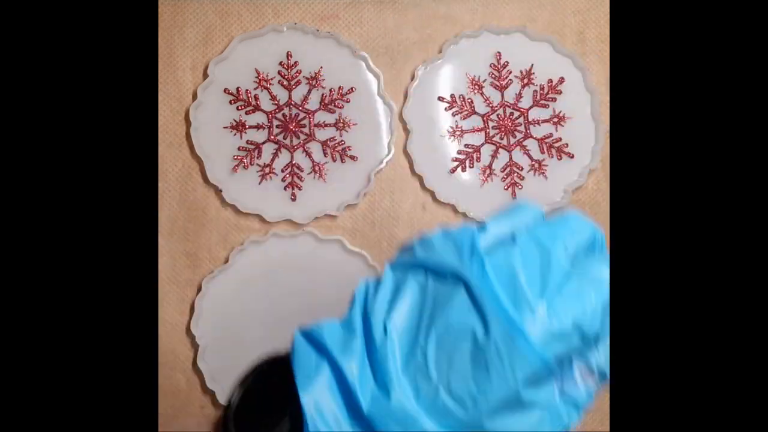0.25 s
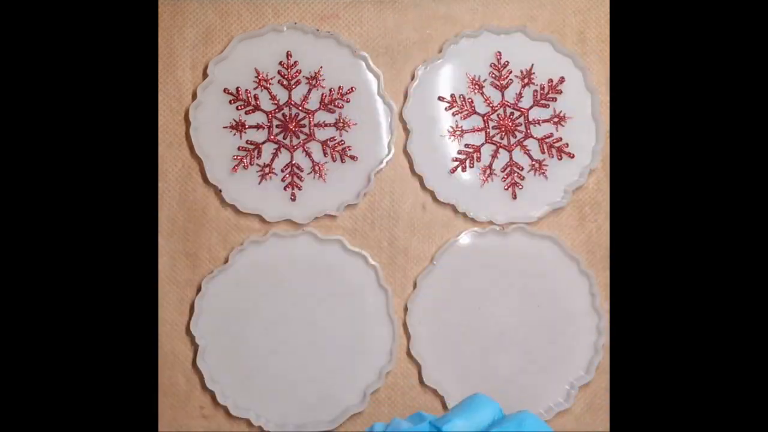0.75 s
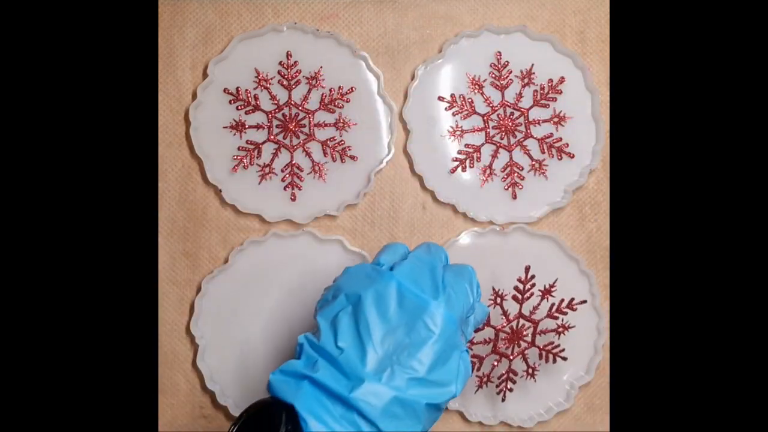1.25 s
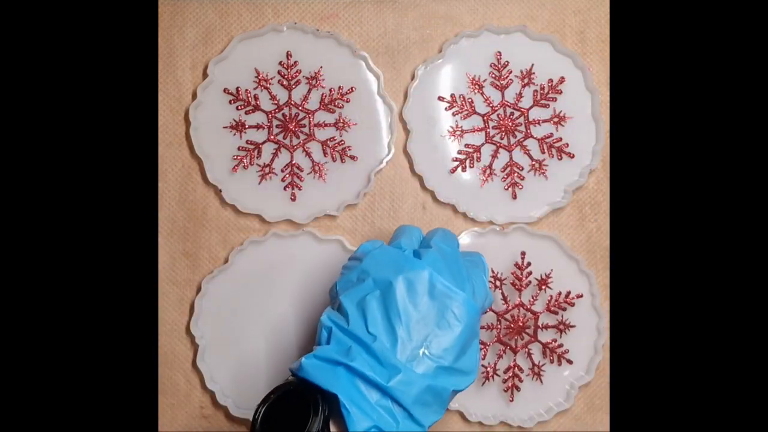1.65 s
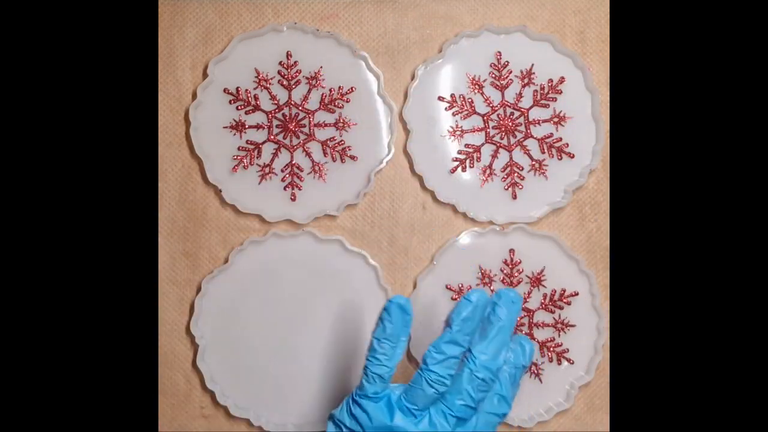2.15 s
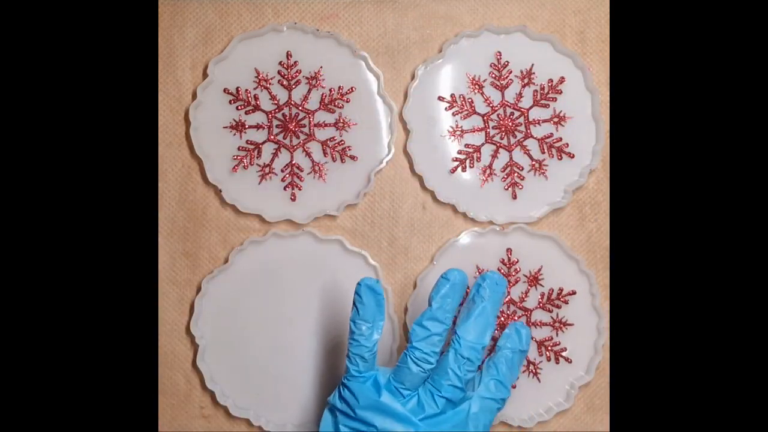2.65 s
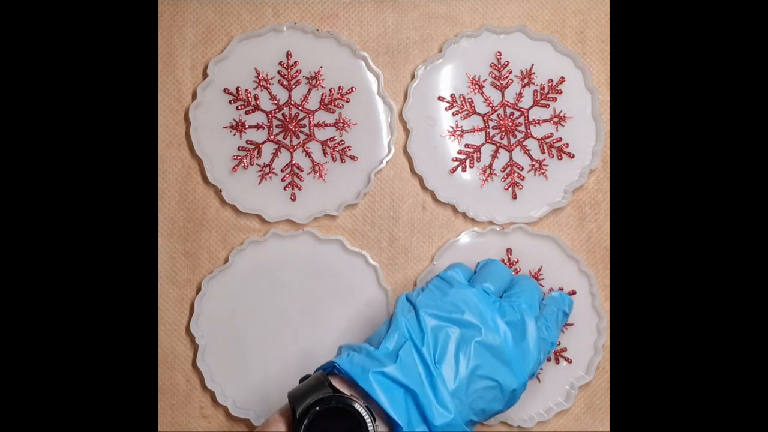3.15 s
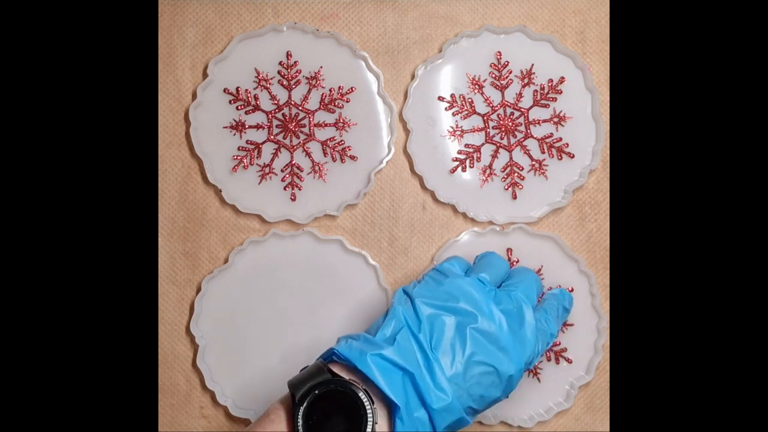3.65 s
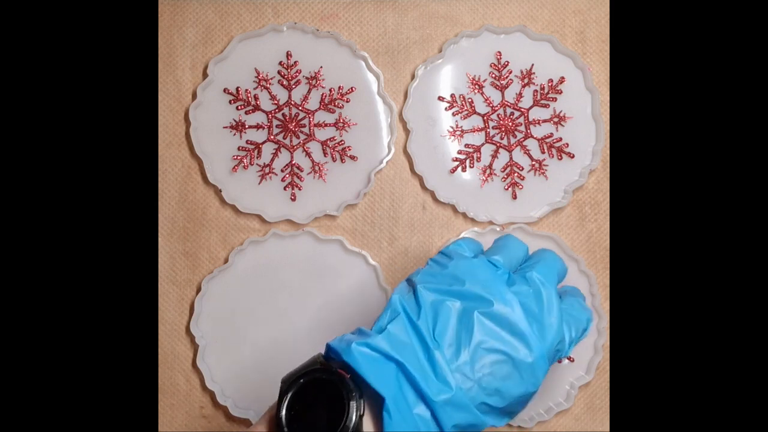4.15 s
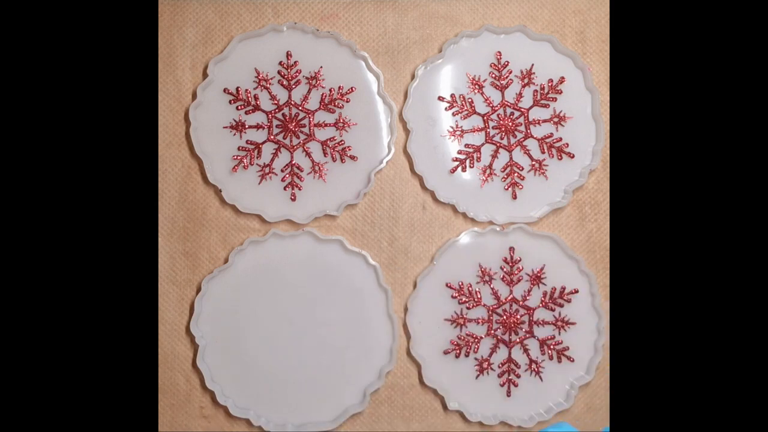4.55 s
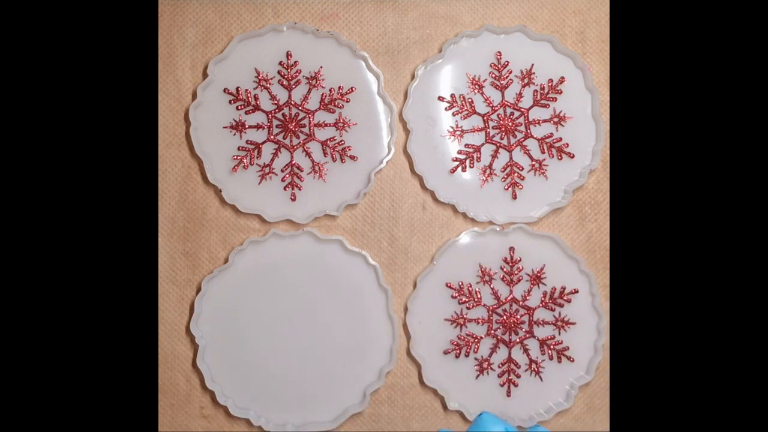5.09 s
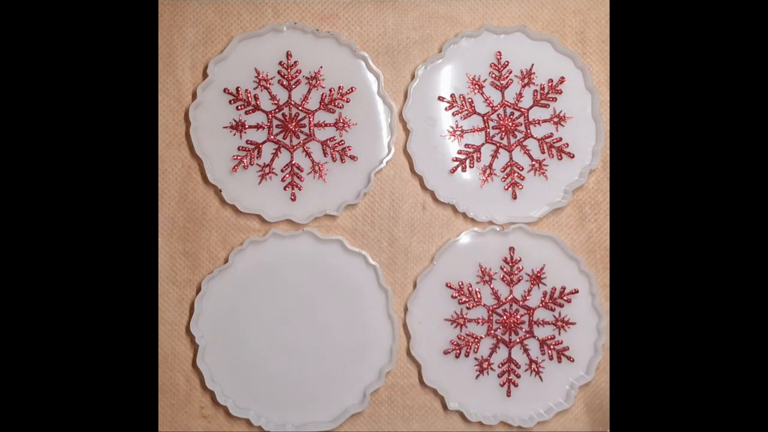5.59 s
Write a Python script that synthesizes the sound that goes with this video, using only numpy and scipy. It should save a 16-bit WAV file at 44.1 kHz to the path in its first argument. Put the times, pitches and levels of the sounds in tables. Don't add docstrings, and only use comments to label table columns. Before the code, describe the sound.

In a quiet room, crisp glove snaps and hard plastic clacks come in one short burst, then return as busier, louder digging.

```python
import sys
import numpy as np
from scipy import signal
from scipy.io import wavfile

SR = 44100
rng = np.random.default_rng(int(sys.argv[2]) if len(sys.argv) > 2 else 0)


def gain_from_db(level_db):
    decades = np.asarray(level_db, float) / 20
    return 10 ** decades


def master(y):
    cut = np.clip(np.atleast_2d(y).T, -1, 1)
    pcm = np.round(cut * 32767)
    wavfile.write(sys.argv[1], SR, pcm.astype(np.int16))


N = 256833

# freq_hz, level_db_per_hz
HUM_SPECTRUM = [(18, -27), (28, -7.5), (50, -3), (100, -8), (200, -1.5), (400, 0), (600, -7.5),
                (1000, -11.5), (2000, -15), (4000, -17.5), (6800, -18.5), (8500, -21), (10000, -60),
                (11500, -34), (17000, -41)]
# freq_hz, correlation
HUM_LIKENESS = [(60, 0.34), (180, 0.84), (550, 0.12), (1650, 0.0074), (15000, -0.26)]
# freq_hz, left_over_right_db
HUM_BALANCE = [(60, 1), (400, 1.5), (2400, 3.5), (8000, 10), (15000, -2)]
# start_s, peak_db, pitch_hz, t60_s
THUDS = [
    (0.01, -37.5, 419, 0.036),
    (0.706, -55, 222, 0.13),
    (4.658, -42.5, 452, 0.051),
    (4.785, -36, 208, 0.067),
    (4.786, -46, 90, 0.1),
    (4.967, -37.5, 72, 0.095),
    (4.972, -37.5, 148, 0.097),
    (5.59, -38.5, 80.6, 0.089),
]
# crest_s, glove_db, ornament_db, swell_20db_s, fade_20db_s
STROKES = [(.01, -71, -63, .05, 0.2), (.42, -53, -66.5, 0.2, 0.1), (.6, -59, -47, 0.08, 0.3),
           (.716, -25.5, -31, 0.0514, 0.0425), (.785, -35.5, -36, 0.08, 0.1156), (1.1, -56, -70, 0.5, 0.2),
           (1.28, -64, -78.5, 0.5, 0.6), (1.81, -58.5, -57, 0.14, 0.14), (2.19, -44, -55.5, 0.1744, 0.1545),
           (2.32, -55.5, -71, 0.13, 0.12), (2.85, -47.5, -58, 0.13, 0.16), (2.99, -51, -64, .14, .2),
           (3.27, -59.5, -72, .08, .1), (4.53, -58.5, -70, 0.15, .08), (4.64, -62, -64.5, 0.23, 1.5),
           (4.83, -56, -55.5, 0.09, 0.4), (4.95, -54, -46.5, 0.06, 0.1), (5.07, -52, -42.5, .06, 0.1),
           (5.2, -50, -47.5, 0.09, 0.1), (5.371, -43.5, -39.5, 0.0758, .1),
           (5.469, -21.5, -26, 0.0677, .11), (5.6, -34, -29, 0.0574, 0), (5.679, -26, -29, 0.0971, 0.04),
           (5.77, -23, -28, 0.0769, 0.03)]
# start_s, crease_db, knock_db, ring_hz
PICKING = [(.0946, -47.5, -53.5, 5600), (.2578, -47.5, -59, 6900), (.3475, -40, -50, 5580),
           (.3766, -40, -47, 6300), (.393, -49, -43.5, 5830), (.411, -40, -44, 6000),
           (.4192, -46, -44, 6500), (.4363, -41, -46, 4600), (.473, -51, -46, 4800),
           (.5093, -43, -50.5, 3470), (.5675, -35.5, -41, 2700), (.5834, -33, -41.5, 6640),
           (.6042, -44, -41, 916), (.6609, -27.5, -26.5, 1900), (.67, -49, -29, 830),
           (.7037, -10, -12, 1453), (.7187, -10, -16.5, 1500), (.756, -11.5, -15, 7360),
           (.775, -13, -17, 6540), (.7852, -10, -13, 7330), (.7959, -18.5, -23, 7180),
           (1.0348, -30.5, -56, 7970), (1.0673, -47, -53, 1410), (1.083, -41, -57, 6900),
           (1.1568, -41.5, -62, 7500), (1.2048, -51, -55, 6680), (1.224, -44, -45, 2000),
           (1.2584, -38.5, -49, 7440), (1.2807, -49, -51.5, 3100), (1.527, -35, -50.5, 5670)]
# start_s, crease_db, knock_db, ring_hz
PLACING = [(1.8154, -38.5, -29, 1400), (1.8624, -60.5, -45.5, 1600), (1.9403, -49.5, -68, 6070),
           (2.0573, -62, -48, 2330), (2.094, -50, -57, 7360), (2.1113, -39, -43.5, 6290),
           (2.13, -35, -45, 7350), (2.1436, -34, -39, 7800), (2.1591, -35, -36, 7580),
           (2.1646, -32, -35.5, 7460), (2.185, -32, -44, 7800), (2.2, -38, -45, 7600),
           (2.233, -38.5, -51, 1250), (2.2493, -50, -51, 7250), (2.2602, -46, -58, 6400),
           (2.3038, -41, -55.5, 6200), (2.3139, -50, -55.5, 7100), (2.773, -42, -56, 6050),
           (2.782, -42, -51.5, 6200), (2.7925, -45, -62, 5760), (2.815, -43, -46, 6500),
           (2.8267, -34, -42, 5460), (2.8515, -34, -43.5, 7440), (2.9272, -41, -47, 6360),
           (2.9348, -42.5, -52, 5500), (2.961, -42, -61, 6160), (2.985, -37, -40.5, 3530),
           (3.0408, -48, -58.5, 5040), (3.2696, -45, -53, 5430)]
# start_s, crease_db, knock_db, ring_hz
FEELING = [(4.6152, -45.5, -54, 5730), (4.6816, -33.5, -58, 5900), (4.7785, -35, -30, 905),
           (4.7896, -41, -23.5, 1080), (4.8471, -46.5, -45, 2180), (4.873, -47, -56, 4930),
           (4.9182, -28, -33, 7850), (4.9509, -37, -33, 995), (4.9668, -36, -31.5, 1180),
           (5.051, -26, -28, 1287), (5.074, -27.5, -40, 7100), (5.0925, -23, -33, 6900),
           (5.1478, -43, -40.5, 1430), (5.1728, -7.5, -19.5, 2128), (5.2218, -42, -32.5, 4500),
           (5.3328, -49, -48, 1140)]
# start_s, crease_db, knock_db, ring_hz
DIGGING = [(5.3626, -32, -27, 2920), (5.3673, -31, -30, 1394), (5.3866, -27, -24, 3820),
           (5.4125, -15, -20.5, 1565), (5.4394, -19, -21.5, 930), (5.451, -10.5, -13, 3610),
           (5.473, -17, -20.5, 1290), (5.4856, -7, -14.5, 1173), (5.5171, -9, -12.5, 1560),
           (5.5328, -16, -35, 6620), (5.5554, -9.5, -15.5, 1500), (5.593, -25, -29, 1130),
           (5.612, -23, -18.5, 1450), (5.6245, -16.5, -17.5, 1560), (5.6535, -22, -20.5, 1840),
           (5.6647, -10, -9.5, 4445), (5.683, -18.5, -27, 7750), (5.7008, -12.5, -12, 2203),
           (5.7478, -12, -17.5, 2330), (5.7546, -25, -16, 6860), (5.773, -8.5, -12.5, 6940),
           (5.8031, -24, -9.5, 1573)]

# low_hz, high_hz
BAND_HZ = [(300, 1500), (1500, 4000), (4000, 8600), (8600, 16500)]
CREASE_DB = [-29.5, -17, 0.1, -0.1]
KNOCK_DB = [0, 0.34, -18, -16]
RUB_GLOVE_DB = [-22.5, -9, -0.16, -10.5]
RUB_ORNAMENT_DB = [-0.1, -2, -14, -20]
BRIGHTEN_DB_PER_DB = [0.01, 0.01, 0.01, .15]
SNAP_DB = [-1, 0.54, -1.2, -4.5]
RUSTLE_DB = [1, 2, -3, 0.9]
RISE_MS = [2.37, 1.3, 1.0, 0.49]
BURST_MS = [5, 2.16, 1.53, 1.1]
# ring_hz, gain_db
SMALL_LOSES_BODY = [(1200, 0.07), (3000, -9.5)]
LARGE_LOSES_CLACK = [(900, -13.5), (1600, 0.42)]
TIGHT_GAINS_AIR = [(4000, -15.5), (5800, -22.5), (6600, -16), (7500, -2.5), (8300, 1)]

# freq_hz, level_db, t60_s
ORNAMENT_MODES = [(456.4, -1, 0.033), (759, -1, 0.2), (1020, -15, 0.23), (1165, 2, 0.043), (1438, 2.5, .07),
                  (1620, -21, 0.03), (2122, 2.5, 0.075), (2317, -9.5, .08), (3070, -6, 0.21),
                  (4060, -3.5, 0.034)]
# freq_hz, width_hz, level_db
FILM_MODES = [(5660, 1450, -6.5), (6500, 293, 4), (7420, 880, -1.5)]
# freq_hz, width_hz, depth_0_to_1
TABLE_DIPS = [(365, 140, 0.06), (589.4, 120, 0.76), (1820, 160, 0.3), (2740, 420, 0.54)]
# lag_s, level_db
ECHOES = [(.0052, -10), (.0031, -15)]
ROOM_T60_S = [0.28, 0.23, 0.2, 0.12]
ROOM_DB = [-5.5, -1.5, -8, -6]

HUM_DB = -58.5
RING_DB, RING_CYCLES = -1, 60.7
HARDEST_DB = -10
MIDDLE_DB = -35
TABLE_DB = -2
PAN_DB = 1.9


def rms_one(x):
    return x / np.sqrt(np.mean(x ** 2) + 1e-20)


def at_hz(points, hz):
    points_hz, values = np.array(points)[:, 0], np.array(points)[:, 1]
    return np.interp(np.log(hz), np.log(points_hz), values)


def band(x, low_hz, high_hz, order=2):
    return signal.sosfilt(signal.butter(order, [low_hz, high_hz], "band", fs=SR, output="sos"), x)


def drift(rate):
    r = np.exp(-40 * np.pi * rate / SR)
    noise = rng.standard_normal(N // 20 + 2002)
    slow = signal.lfilter([1], [1, -2 * r, r * r], noise)[2000:]
    return np.interp(np.arange(N) / 20, np.arange(len(slow)), rms_one(slow))


def resonate(x, hz, width_hz):
    r = np.exp(-np.pi * width_hz / SR)
    zeros = np.array([1, 0, -1]) * (1 - r * r) / 2
    poles = [1, -2 * r * np.cos(2 * np.pi * hz / SR), r * r]
    return signal.lfilter(zeros, poles, x)


def room_hum():
    out = 0
    edges_hz = 20 * 2 ** np.arange(0, 9.8, .4)
    white = rng.standard_normal((2, 2, N + SR))
    together = drift(0.83)
    for k, (low_hz, high_hz) in enumerate(zip(edges_hz, edges_hz[1:])):
        mid, side = band(white[k % 2], low_hz, high_hz)[:, SR:]
        hz = np.sqrt(low_hz * high_hz)
        alike = np.clip(at_hz(HUM_LIKENESS, hz), -1, 1)
        tilt_db = at_hz(HUM_BALANCE, hz) / 2
        gain = gain_from_db(at_hz(HUM_SPECTRUM, hz) + .5 * together + 1.9 * drift(7.5))
        pair = np.sqrt(1 + alike) * mid + np.sqrt(1 - alike) * side * [[1], [-1]]
        out = out + gain * pair * gain_from_db(np.array([[tilt_db], [-tilt_db]]))
    return gain_from_db(HUM_DB) * out / np.sqrt(np.mean(out.mean(axis=0) ** 2))


def thuds():
    out = np.zeros(N)
    for start_s, db, hz, t60_s in THUDS:
        t = np.clip(np.arange(N) / SR - start_s, 0, None)
        swell = 1 - np.exp(-t / 0.0017)
        out += gain_from_db(db - 60 * t / t60_s) * swell * np.sin(2 * np.pi * hz * t)
    return out


def by_band(glove_db, ornament_db, glove_colour_db, ornament_colour_db):
    parts = []
    for db, colour_db in ((glove_db, glove_colour_db), (ornament_db, ornament_colour_db)):
        brighter_db = np.outer(BRIGHTEN_DB_PER_DB, db - MIDDLE_DB)
        parts.append(db + np.array(colour_db)[:, None] + brighter_db)
    return 10 * np.log10(gain_from_db(parts[0]) ** 2 + gain_from_db(parts[1]) ** 2)


def effort():
    crest_s, glove_db, ornament_db, swell_s, fade_s = np.transpose(STROKES)[:, :, None]
    t = np.arange(0, N, 64) / SR - crest_s
    shape_db = -20 * np.maximum(-t / swell_s, t / fade_s)
    return [10 * np.log10(np.sum(gain_from_db(db + shape_db) ** 2, axis=0) + 1e-10) for db in (glove_db, ornament_db)]


def rustle():
    columns = by_band(*effort(), RUB_GLOVE_DB, RUB_ORNAMENT_DB)
    level_db = [np.repeat(db, 64)[:N] + trim_db for db, trim_db in zip(columns, RUSTLE_DB)]
    flips_per_s = 1200 * gain_from_db(4.0 * drift(25))
    born = rng.random(N) < flips_per_s / SR
    sizes = gain_from_db(3.7 * np.minimum(rng.exponential(1, N), 4)) * born
    grains = rms_one(signal.lfilter([1], [1, -.95], sizes) * rng.standard_normal(N))
    hiss = 0.77 * rng.standard_normal(N) * gain_from_db(4.0 * drift(28.5))
    near = grains + hiss
    rub = np.array([near, np.roll(near, 7)]) * gain_from_db(np.array([[PAN_DB], [-PAN_DB]]))
    return np.array([gain_from_db(level_db[k] + 3.2 * drift(36)) * rms_one(band(rub, *BAND_HZ[k])) for k in range(4)])


def snaps():
    rows = np.vstack([PICKING, PLACING, FEELING, DIGGING])
    out = np.zeros((4, 2, N + SR))
    t = np.arange(2048) / SR
    chance = rng.random((len(rows), 3))
    noise = rng.standard_normal((len(rows), 4, len(t) + 512))
    lags = (3 + 9 * chance[:, 0]).astype(int)
    pans_db = PAN_DB + 1.2 * (2 * chance[:, 1] - 1)
    hz = rows[:, -1:]
    levels_db = by_band(rows[:, 1], rows[:, 2], CREASE_DB, KNOCK_DB)
    size_laws = (SMALL_LOSES_BODY, LARGE_LOSES_CLACK, TIGHT_GAINS_AIR)
    levels_db[[0, 1, 3]] += [at_hz(law, rows[:, -1]) for law in size_laws]
    for k, burst_ms in enumerate(BURST_MS):
        rise = 1 - np.exp(-1000 * t / RISE_MS[k])
        shape = np.exp(-1000 * t / burst_ms) * rise ** 2
        puffs = band(noise[:, k], *BAND_HZ[k])[:, 512:] * shape
        puffs = puffs / np.abs(puffs).max(axis=1)[:, None]
        ring_fall_db = 60 * t * hz ** .5 * 50 / RING_CYCLES
        rings = gain_from_db(RING_DB - ring_fall_db) * np.sin(2 * np.pi * hz * t) * rise
        puffs = puffs + rings * ((hz >= BAND_HZ[k][0]) & (hz < BAND_HZ[k][1]))
        for row, db, puff, lag, pan_db in zip(rows, levels_db[k], puffs, lags, pans_db):
            at = int(row[0] * SR)
            gain = gain_from_db(min(db, HARDEST_DB) + SNAP_DB[k] + 4.5)
            out[k, 0, at:at + len(t)] += gain * gain_from_db(pan_db) * puff
            out[k, 1, at + lag:at + lag + len(t)] += gain * gain_from_db(-pan_db) * puff
    return out[..., :N]


def ornaments(drive, modes):
    t60_1s_width_hz = np.log(1000) / np.pi
    out = 0
    for k, (hz, db, t60_s) in enumerate(modes):
        gripped = drive * gain_from_db(2.0 * drift(25))
        out = out + (-1) ** k * gain_from_db(db + 6) * resonate(gripped, hz, t60_1s_width_hz / t60_s)
    return out


def film(drive):
    return sum((-1) ** k * gain_from_db(db + 4) * resonate(drive, hz, width_hz)
               for k, (hz, width_hz, db) in enumerate(FILM_MODES))


def space(bands):
    t = np.arange(SR // 2) / SR
    paths = np.zeros((2, len(t)))
    paths[:, 0] = 1
    for lag_s, db in ECHOES:
        paths[[0, 1], int(lag_s * SR) + np.array([4, 0])] = gain_from_db(db)
    common, own = rng.standard_normal(len(t)), rng.standard_normal((2, len(t)))
    out = 0
    for k, x in enumerate(bands):
        alike = [.85, .3, 0, 0][k]
        diffuse = alike * common + np.sqrt(1 - alike ** 2) * own
        tail = diffuse * gain_from_db(-60 * t / ROOM_T60_S[k]) * (1 - np.exp(-t / 0.0035))
        tail = gain_from_db(ROOM_DB[k]) * tail / np.sqrt(np.sum(tail ** 2) / 2)
        out = out + signal.oaconvolve(x, paths + tail, axes=1)[:, :N]
    return out


def scene():
    body, clack, snap, air = snaps() + rustle()
    table = gain_from_db(TABLE_DB) * band(body, 112, 333) + thuds()
    body = signal.sosfilt(signal.butter(2, 400, "high", fs=SR, output="sos"), body)
    body = body + ornaments(body, ORNAMENT_MODES[:5])
    clack = clack + ornaments(clack + 0.17 * snap, ORNAMENT_MODES[5:])
    for hz, width_hz, depth in TABLE_DIPS:
        body = body - depth * resonate(body, hz, width_hz)
        clack = clack - depth * resonate(clack, hz, width_hz)
    snap = 0.61 * snap + film(snap)
    return space([body + table, clack, snap, air]) + room_hum()


def band_limit(x):
    return signal.sosfilt(signal.butter(12, 16390, fs=SR, output="sos"), x)


def record(dry):
    rounded = 1.05 * np.tanh(dry / 1.05)
    low_pass = signal.ellip(12, .5, 70, 16150, fs=SR, output="sos")
    mix = signal.sosfilt(low_pass, rounded)
    return band_limit(mix)


dry = scene()
out = record(dry)
master(out)
```